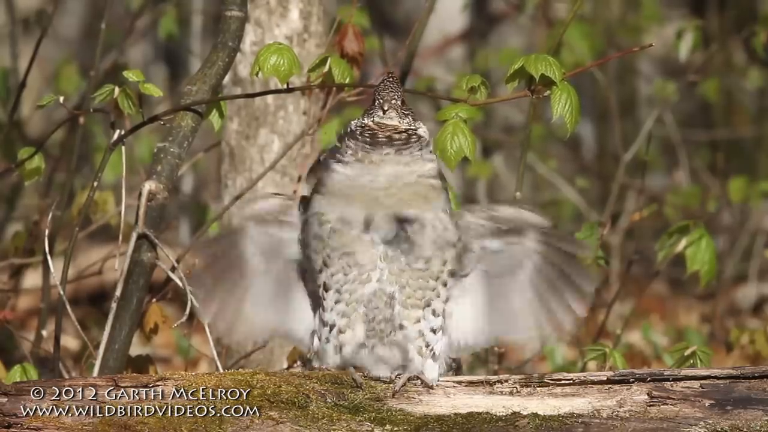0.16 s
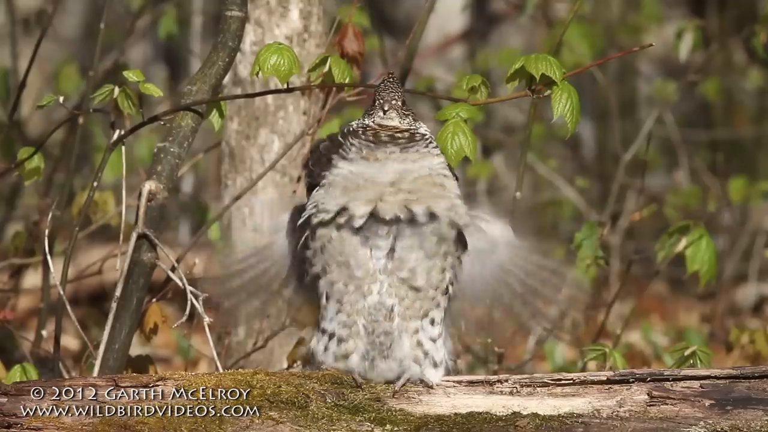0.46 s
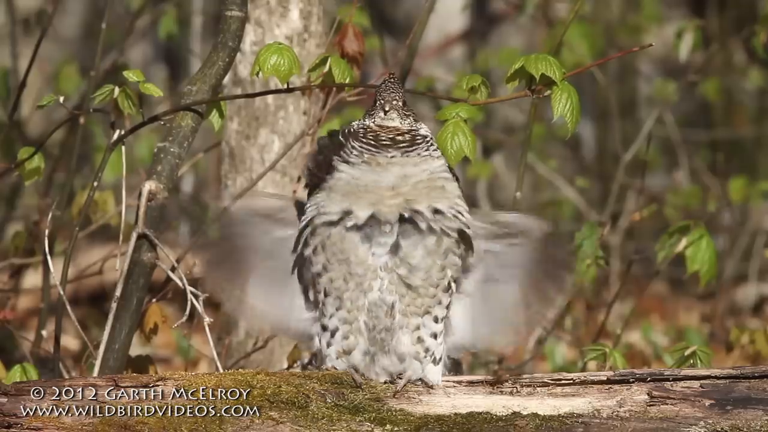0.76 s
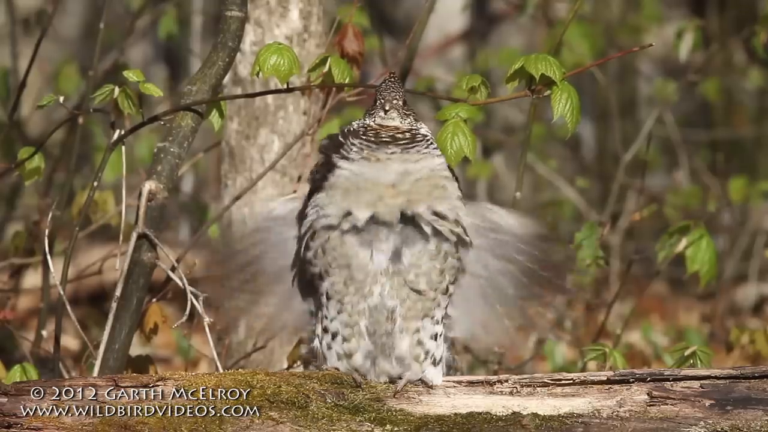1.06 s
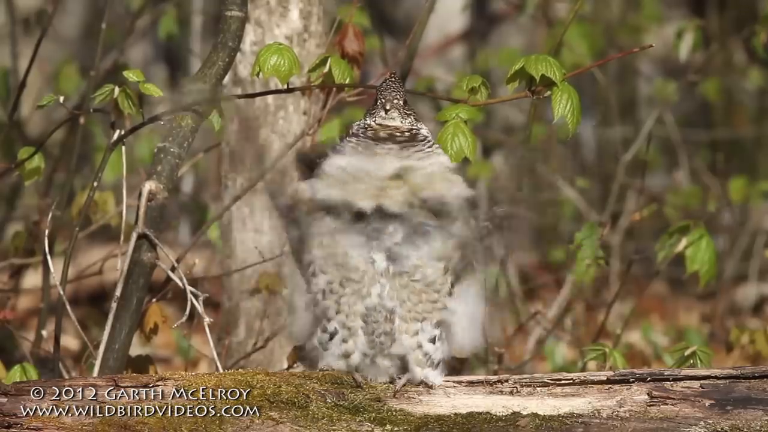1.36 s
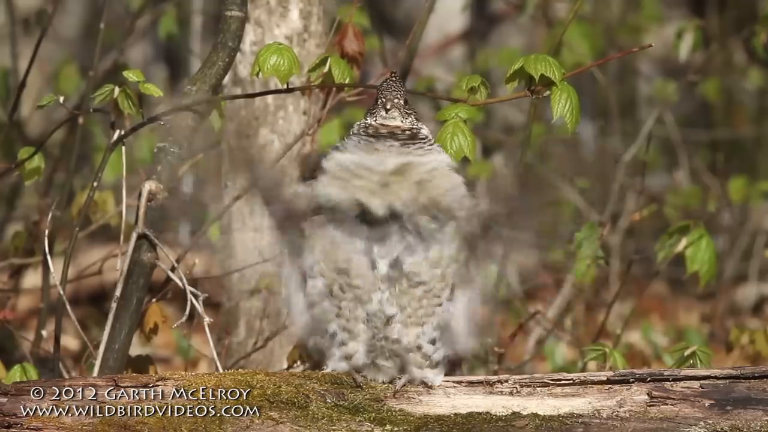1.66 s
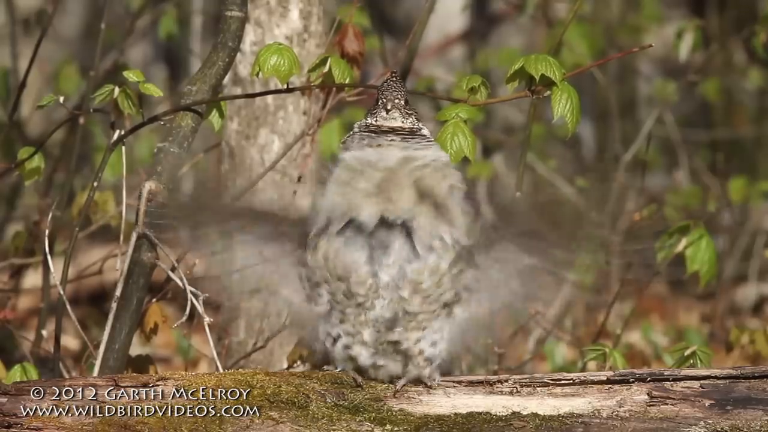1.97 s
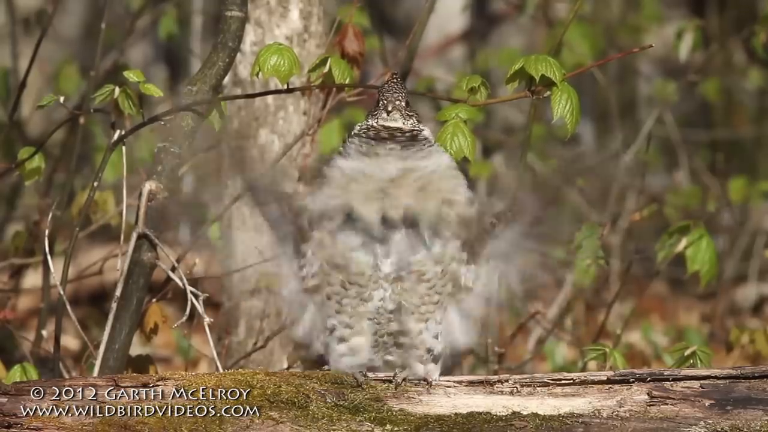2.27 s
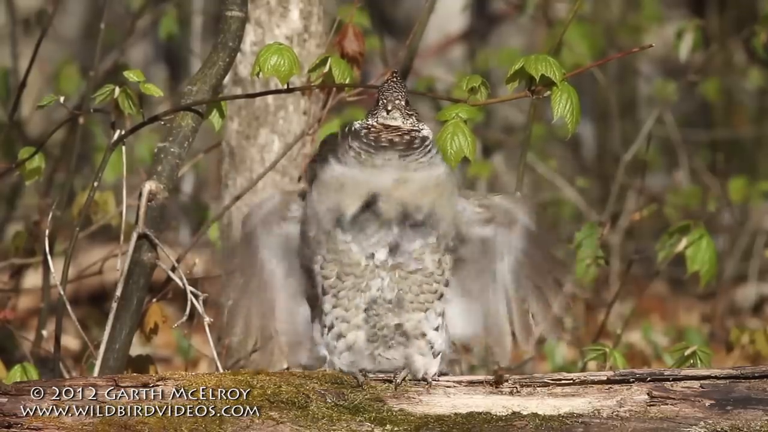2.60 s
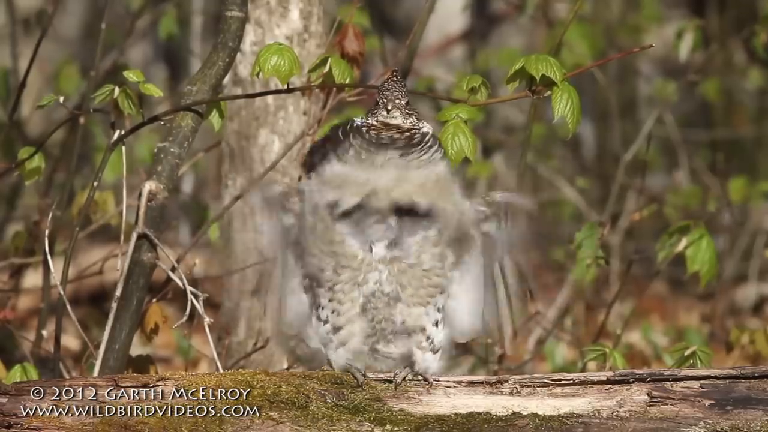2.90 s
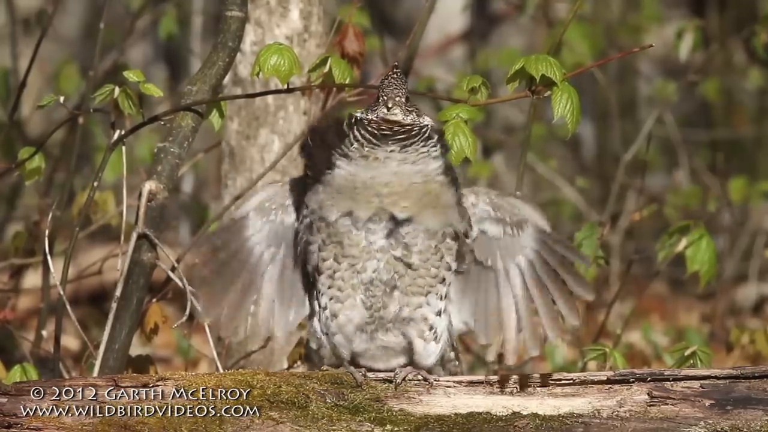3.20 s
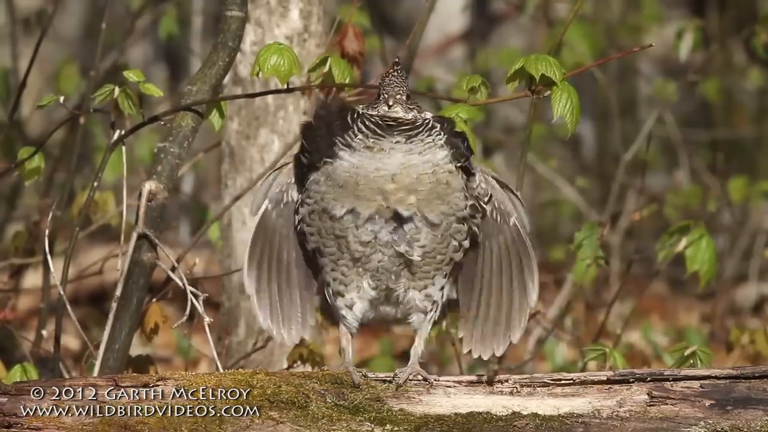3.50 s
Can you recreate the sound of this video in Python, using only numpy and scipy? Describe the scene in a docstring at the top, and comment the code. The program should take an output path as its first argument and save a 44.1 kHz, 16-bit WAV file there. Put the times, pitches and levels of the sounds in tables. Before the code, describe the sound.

A grouse drums its wings in deep soft thumps, speeding to a flutter, then slowing

```python
"""A grouse on a log drums its wings, faster and then slower, a little left of a stereo microphone.
Each stroke is a skewed low pressure pulse with a snap and an echo, plus a swish of feathers in shaped noise.
The place is a quiet spring wood: wide still air and low wind in filtered noise, leaves ticking in noise bursts.
A songbird whistles on the right and fainter birds call far away, all as gliding sines with echoes."""
import sys
import numpy as np
from scipy import signal
from scipy.fft import rfft, irfft
from scipy.io import wavfile
from scipy.ndimage import uniform_filter1d

SR = 44100
rng = np.random.default_rng(int(sys.argv[2]) if len(sys.argv) > 2 else 0)


def to_wav(sig):
    """Store sig (one row per channel, or 1-D mono) as 16-bit WAV at the path in sys.argv[1].

    Samples outside -1..1 are clipped; the rate is SR.
    """
    pcm = np.clip(np.atleast_2d(sig), -1, 1) * 32767
    pcm = np.round(pcm).astype(np.int16)
    wavfile.write(sys.argv[1], SR, pcm.T)  # frames by channels


N = 160965  # samples


def undb(db):
    """dB to gain."""
    return 10 ** (np.asarray(db) / 20)


def curve(table, hz):
    """Table of (f/Hz, value) read on a log frequency axis."""
    a = np.array(table)
    return np.interp(np.log(hz + 1), np.log(a[:, 0]), a[:, 1])


def unit(x):
    """Scale to rms 1."""
    return x / np.sqrt(np.mean(x ** 2))


def pan(x, db):
    """Place x by a left-right level difference; the mean of the two channels stays x."""
    g = undb(np.array([[db], [-db]]) / 2)
    return x * g / g.mean()


def walk(rate, n):
    """Random levels drawn at a rate in Hz and slewed between, rms 1."""
    k = max(int(SR / rate), 1)
    steps = np.repeat(rng.standard_normal(n // k + 1), k)
    return unit(uniform_filter1d(steps, k)[:n])


def wood(x, t60, db, gap_s):
    """Scattered returns from trunks: decaying noise after a gap, different left and right."""
    t = np.arange(SR // 2) / SR
    ir = rng.standard_normal((2, len(t))) * undb(-60 * t / t60) * (t > gap_s)
    ir = ir / np.sqrt(np.sum(ir[0] ** 2))
    return undb(db) * signal.fftconvolve(x[None], ir, axes=1)[:, :len(x)]


def note(out, s, hz, gain):
    """Add a sine following a pitch track from s seconds; gain is its rms."""
    v = gain * np.sin(2 * np.pi * np.cumsum(hz) / SR) * np.sqrt(2)
    i = int(s * SR)
    return out + np.pad(v, (i, N))[:N]


# wing strokes, for thump and swish: t/s, thump peak level/dB, low swish level/dB, high swish level/dB
STROKES = [(0.1897, -7, -43, -51.5), (0.3857, -7, -43, -51), (0.5666, -7, -46, -49),
           (0.7356, -6.5, -46.5, -52), (0.8949, -6.5, -42, -51), (1.0434, -7, -44.5, -51),
           (1.1807, -7.5, -45.5, -52), (1.3088, -8, -48, -53.5), (1.4277, -8.5, -47.5, -54.5),
           (1.5368, -8, -54.5, -59), (1.6384, -8.5, -56.5, -58.5), (1.7332, -9.5, -53.5, -58),
           (1.8218, -9.5, -60.5, -64), (1.9032, -9.5, -62, -64.5), (1.9775, -10, -73, -62.5),
           (2.0457, -9.5, -76, -61), (2.108, -10, -61.5, -62), (2.1629, -10.5, -55.5, -64),
           (2.2127, -8, -56.5, -70), (2.2694, -10.5, -58, -65.5), (2.3345, -10, -66, -61),
           (2.4048, -11.5, -60.5, -56.5), (2.4794, -10.5, -70, -64), (2.5596, -10.5, -62, -63),
           (2.6462, -10.5, -58.5, -64), (2.7403, -11, -59.5, -61), (2.8421, -11, -55.5, -62.5),
           (2.9534, -11.5, -59.5, -64.5), (3.0752, -12.5, -61.5, -61.5), (3.2108, -13.5, -58, -62.5),
           (3.3665, -15, -58.5, -64)]
# a stroke just before the start, of which only the tail is heard; same columns
EARLIER_STROKE = (-.021, -6.7, -49, -54)
# "hard" below is the thump level in dB above -10 dB
PAD = 8192  # samples in one pulse, and margin at each end
BASS_SLOPE, SKEW_RAD, THUMP_LATE_S = 3.6, .56, .00075
THUMP_HZ, THUMP_HZ_PER_DB = 62, .8  # harder strokes are higher
EDGE_HZ, EDGE_HZ_PER_DB, EDGE_DB = 124, 4, -14.5  # snap on the falling front
EDGE_EARLY_S, EDGE_S_PER_DB = .003, .00022
ECHO_S, ECHO_DB, ECHO_PER_DB = .0195, -22.5, .8  # echo of the body, relatively weaker for harder strokes
ECHO_EDGE_S, ECHO_EDGE_DB = .0209, -17  # echo of the snap, relatively louder for harder strokes
RIPPLE_S, RIPPLE_DB = .017, -22  # faint opposite ripple 17 ms before the snap
WOOD_T60_S, WOOD_DB = .35, -25
THUMP_PAN_DB, RIGHT_LEAD_S = 7.6, .00013


def thumps(strokes):
    """One skewed dip-and-rebound of pressure a stroke, built as a spectrum, with a snap and an echo."""
    out = np.zeros(N + 2 * PAD)
    f = np.fft.rfftfreq(PAD, 1 / SR)

    def late(s):
        """Delay by s seconds."""
        return np.exp(-2j * np.pi * f * s)

    def bell(hz, p):
        """Spectral hump with its peak of 1 at hz."""
        return (f / hz) ** BASS_SLOPE * np.exp(BASS_SLOPE / p * (1 - (f / hz) ** p))

    for s, db, _, _ in strokes:
        hard = db + 10
        at = (s + THUMP_LATE_S) * SR + PAD / 2
        body = bell(THUMP_HZ + THUMP_HZ_PER_DB * hard, 1)
        edge = undb(EDGE_DB) * bell(EDGE_HZ + EDGE_HZ_PER_DB * hard, 2.07)
        edge = edge * late(EDGE_S_PER_DB * hard - EDGE_EARLY_S)
        echo = undb(ECHO_DB - ECHO_PER_DB * hard) * body * late(ECHO_S)
        echo = echo + undb(ECHO_EDGE_DB + hard) * edge * late(ECHO_EDGE_S)
        ripple = -undb(RIPPLE_DB) * edge * late(-RIPPLE_S)
        spectrum = (ripple + body + edge + echo) * np.exp(1j * SKEW_RAD)
        pulse = irfft(spectrum * late((PAD / 2 + at % 1) / SR))
        out[int(at):int(at) + PAD] -= pulse * undb(db) / np.abs(pulse).max()
    wet = wood(out, WOOD_T60_S, WOOD_DB, .0043)
    left, right = pan(out, THUMP_PAN_DB) + wet
    at = np.arange(PAD, PAD + N)
    right_early = np.interp(at + RIGHT_LEAD_S * SR, np.arange(len(right)), right)
    return np.array([left[at], right_early])


# envelope shape, rows low and high band: rise t/s and fall t/s of the peak at a -10 dB thump,
# mean second burst level/dB, rush level/dB re thump at 10 strokes a second, rush rise t/s, rush tail t/s
SWISH_SHAPE = [(0.0095, 0.0044, -8.5, -49, 0.035, 0.027), (0.0074, 0.0096, -13.5, -57.5, 0.018, 0.033)]
# envelope timing re thump, rows low and high band: lead of the wings' start t/s, peak t/s, mean second burst t/s
SWISH_TIME = [(.023, .0002, .016), (.023, -.005, .017)]
# colour of the feather noise before the band split: f/Hz, relative level/dB per Hz
SWISH_COLOUR = [(120, 1.5), (230, -0.5), (352, -9), (711, -19.5), (1500, -15.5), (2100, -14), (3500, -19),
                (4840, -30), (5370, -40), (8520, -27.5), (10800, -28.5), (15000, -47.5)]
# side of the swish: f/Hz, left-right level/dB
SWISH_PAN = [(300, 6.5), (1300, 5), (2400, 5), (4400, 0), (8000, -1), (14000, 5.5)]
# phase between the two microphone ports: f/Hz, phase/rad
PORT_LAG = [(2000, .05), (4500, .7), (6000, 1.4), (8000, 2.1), (13000, 2.3)]
# likeness of the two ports: f/Hz, share of power in common
SWISH_ALIKE = [(300, .97), (700, .9), (3000, .97), (5500, .6), (8000, .94), (13000, .7)]
# colour of the rush: f/Hz, level/dB re the bursts
RUSH_COLOUR = [(300, 3.5), (800, 3.5), (2000, -4.5), (5200, 4), (9000, -3)]
RUSH_RATE_DB = 3.5  # gain when the stroke rate doubles
ONSET_S, SPLIT_HZ = .006, 4950
GRAIN_DB, GRAIN_HZ = 3, 450
SLAP_DB, SLAP_PER_DB, SLAP_S = -5.5, 1, .00071  # sharp centre, level at a -9 dB thump; harder slaps more
SOFT_SPREAD = .072  # weaker strokes swish more broadly, exponent per dB


def hump(u, rise, fall):
    """Exponential rise to 1 at u = 0, then exponential fall."""
    return np.exp(np.where(u < 0, u / rise, -u / fall))


def swish(strokes):
    """Grainy air through the feathers: a steady rush through the stroke, a peak, a ragged second burst."""
    t, f = np.arange(N) / SR, np.fft.rfftfreq(N, 1 / SR)
    out = 0
    paces = np.log2(.1 / np.gradient([b[0] for b in strokes]))  # octaves above 10 strokes a second
    alike = np.clip(curve(SWISH_ALIKE, f), 0, 1)
    side = np.array([[.5], [-.5]])  # left, right
    port_gain = undb(curve(SWISH_COLOUR, f) + side * curve(SWISH_PAN, f))
    ports = port_gain * np.exp(1j * side * curve(PORT_LAG, f))
    for k, (timing, shape) in enumerate(zip(SWISH_TIME, SWISH_SHAPE)):
        start, peak, again = timing
        rise, fall, again_db, rush_db, swell, tail = shape
        # row 0 is common to both ports, rows 1 and 2 are their own
        noise = rng.standard_normal((3, N)) * undb(GRAIN_DB * walk(GRAIN_HZ, N))
        env = np.zeros((2, 1, N))  # bursts, rush
        for b, ragged, pace in zip(strokes, rng.standard_normal((40, 2)), paces):
            i = np.abs(t - b[0]) < .25
            u = t[i] - b[0]
            wide = np.exp(-SOFT_SPREAD * (b[1] + 10))
            main = hump(u - peak, rise * wide, fall * wide)
            slap = undb(SLAP_DB + SLAP_PER_DB * (b[1] + 9)) * hump(u - peak, SLAP_S, SLAP_S)
            second = hump(u - again - .0013 * ragged[1], .0051, .0093)
            bursts = main + slap + undb(again_db + .65 * ragged[0]) * second
            rush = undb(b[1] + rush_db + RUSH_RATE_DB * pace) * hump(u, swell, tail)
            onset = np.clip((u + start) / ONSET_S, 0, 1)
            env[:, 0, i] += np.array([undb(b[2 + k]) * bursts, rush]) * onset
        band = ports / (1 + ((f + 1) / SPLIT_HZ) ** (8 if k == 0 else -8))
        # levels refer to the noise in this part of the band
        ref = (f > 900) & (f < 2400) if k == 0 else (f > 6500) & (f < 12000)
        ref_power = np.sum(np.abs(band[:, ref].mean(axis=0)) ** 2) / len(f)
        scale = 1 / np.sqrt(ref_power) / noise.std()
        n = rfft(noise * env[0])
        n = n + rfft(noise[:, ::-1] * env[1]) * undb(curve(RUSH_COLOUR, f))  # rush: the noise time-reversed
        mixed = np.sqrt(alike) * n[0] + np.sqrt(1 - alike) * n[1:]
        out = out + irfft(mixed * band * scale, N)
    return out


# colour of the still air: f/Hz, relative level/dB per Hz
AIR_COLOUR = [(12, -73), (20, 2), (118, -3), (294, -18), (1200, -21.5), (2000, -27), (8860, -31),
              (13100, -30.5), (15000, -66)]
# low wind: t/s, level/dB
GUST_DB = [(0, -87), (3.35, -50.5), (3.65, -41)]
AIR_DB, GUST_HZ = -61.5, 27.8
AIR_SHARED = .7  # gain of the low air common to both ports


def air():
    """Wide still air of the wood, partly shared at low frequency, and separate low wind on each port."""
    f = np.fft.rfftfreq(N, 1 / SR)
    n = rfft(rng.standard_normal((3, N)))
    shared = AIR_SHARED * n[2] / (1 + (f / SPLIT_HZ) ** 4)
    hush = unit(irfft((n[:2] + shared) * undb(curve(AIR_COLOUR, f)), N))
    hush = hush * undb(AIR_DB + walk(3.29, N))
    wind = rfft(rng.standard_normal((2, N))) * f / (1 + (f / GUST_HZ) ** 4)
    wind = unit(irfft(wind, N))
    g = np.array(GUST_DB).T
    return hush + wind * undb(np.interp(np.arange(N) / SR, g[0], g[1]))


# clear ticks and rustles of leaves and bark: t/s, peak level/dB, nominal f/Hz, decay t/s
TICKS = [(.074, -52, 7500, .001), (1.138, -54, 4500, .008), (1.232, -57, 8000, .001),
         (1.239, -55, 8500, .001), (2.381, -43, 11000, .008), (3.242, -57, 7000, .002)]
TICK_S, TICK_RATE, SMALL_TICK_DB = .001, 10, -60  # small ticks: decay, number a second, loudest peak


def ticks():
    """Short bright bursts of band-passed noise from all sides: the clear ones, and small ones at random."""
    small = rng.random((40, 3))[:int(TICK_RATE * N / SR)]
    rows = list(TICKS)
    for a, b, c in small:
        rows.append((a * N / SR, SMALL_TICK_DB - 10 * b, 5000 + 5000 * c, TICK_S))
    length = 2048
    out, t = np.zeros((2, N + length)), np.arange(length) / SR
    for (s, db, hz, decay), n in zip(rows, rng.standard_normal((60, length))):
        edges = [hz / 2, min(hz * 1.45, 16000)]
        sos = signal.butter(2, edges, "band", fs=SR, output="sos")
        v = signal.sosfilt(sos, n * t * np.exp(-2 * t / decay))
        i = int(s * SR)
        out[:, i:i + length] += pan(v * undb(db) / np.abs(v).max(), 3 * n[0])  # random side
    return out[:, :N]


# pitch of one whistle, before the call's ratio: t/s from its start, f/Hz
WHISTLE_PITCH = [(0, 2870), (.028, 3220), (.037, 3540), (.047, 2640), (.052, 3740), (.059, 3340),
                 (.064, 3550), (.075, 3570), (.118, 3100), (.146, 2930), (.185, 2750)]
# loudness of one whistle: t/s from its start, level/dB re the call
WHISTLE_DB = [(0, -7), (.008, 7.5), (.035, 3.5), (.056, 9.5), (.062, -7), (0.066, 7), (.095, 5), (.14, 0.5),
              (.17, -3), (.185, -30)]
# the calls: t/s, level/dB, pitch ratio
WHISTLES = [(.277, -67, 1.0), (.55, -60.5, .98), (1.944, -60.5, .985), (3.176, -74, 1.01),
            (3.425, -69.5, .98)]
BURR_HZ, BURR_DB, BURR_FROM_S, BURR_TO_S = 310, -10, .068, .17  # sidebands of the fall
WHISTLE_PAN_DB, BIRD_ECHO_DB, BIRD_T60_S = -7, -8, .25


def songbird():
    """Whistle off to the right: rise, quick dip, long fall burred by fast amplitude modulation."""
    pitch, level = np.array(WHISTLE_PITCH).T, np.array(WHISTLE_DB).T
    out = np.zeros(N)
    t = np.arange(int(pitch[0, -1] * SR)) / SR
    hz = uniform_filter1d(np.interp(t, *pitch), size=90)
    db = np.interp(t, *level)
    through_burr = np.clip((t - BURR_FROM_S) / (BURR_TO_S - BURR_FROM_S), 0, 1)
    burr = undb(BURR_DB) * np.sin(np.pi * through_burr) * undb(3 * walk(60, len(t)))
    flutter = 1 + 2 * burr * np.sin(2 * np.pi * BURR_HZ * t)
    for s, call_db, ratio in WHISTLES:
        out = note(out, s, hz * ratio, undb(call_db + db) * flutter)
    return pan(out, WHISTLE_PAN_DB) + wood(out, BIRD_T60_S, BIRD_ECHO_DB, .0017)


# thin high call: t/s, length t/s, starting f/Hz, level/dB
SEEP = (.65, .16, 7450, -79)
TRILL_HZ, TRILL_RISE_HZ, TRILL_DB = 4680, 520, -76
TRILL_START_S, TRILL_GAP_S, TRILL_LEN_S, TRILL_FADE_DB = 2.312, .1163, .04, .45  # gap from start to start; fade a note


def far_birds():
    """Gliding sines with a strong wood echo: a run of short rising notes and one thin high call."""
    out = np.zeros(N)
    u = np.linspace(0, 1, int(TRILL_LEN_S * SR))
    rising_hz = TRILL_HZ + TRILL_RISE_HZ * np.sin(u * 1.49)
    for k in range(12):
        gain = undb(TRILL_DB - TRILL_FADE_DB * k + 2 * walk(170, len(u))) * np.sin(np.pi * u)
        out = note(out, TRILL_START_S + k * TRILL_GAP_S, rising_hz, gain)
    s, length, hz, db = SEEP
    u = np.linspace(0, 1, int(length * SR))
    out = note(out, s, hz * (1 - .01 * u), undb(db) * np.sin(np.pi * u) ** .4)
    return out + wood(out, BIRD_T60_S, -10, .005)


def scene():
    """The drumming, the air, the leaves and the birds at the two microphone ports."""
    strokes = [EARLIER_STROKE] + list(STROKES)
    return thumps(strokes) + swish(strokes) + air() + ticks() + songbird() + far_birds()


TOP_HZ = 14600


def record(dry):
    """The recorder cuts the top with a steep low-pass."""
    return signal.sosfilt(signal.ellip(8, .2, 70, TOP_HZ, fs=SR, output="sos"), dry)


dry = scene()
out = record(dry)
to_wav(out)
```